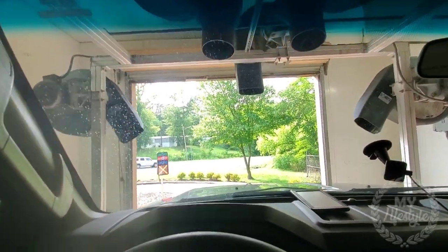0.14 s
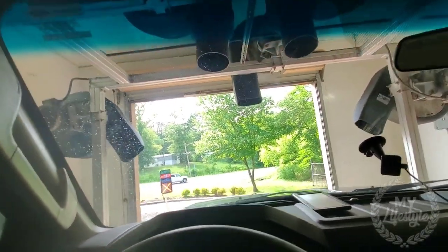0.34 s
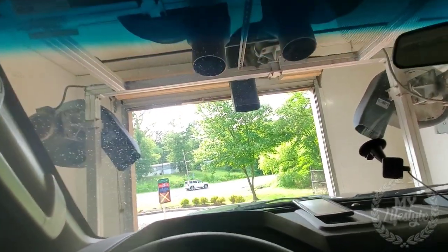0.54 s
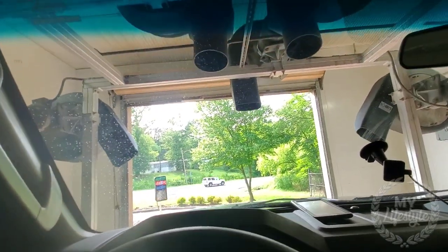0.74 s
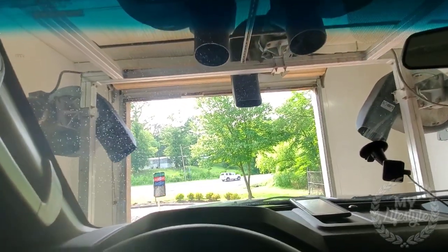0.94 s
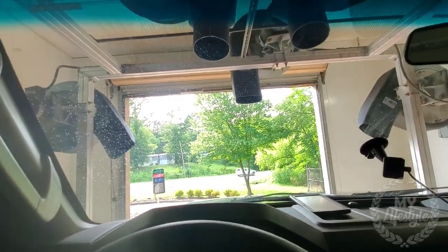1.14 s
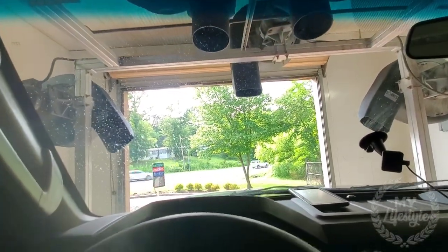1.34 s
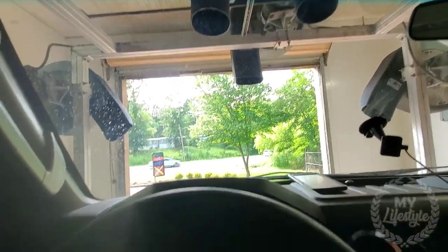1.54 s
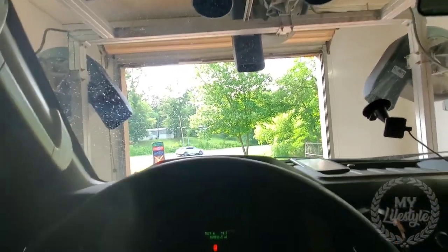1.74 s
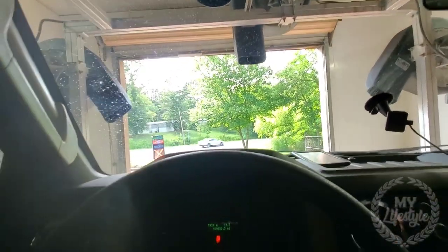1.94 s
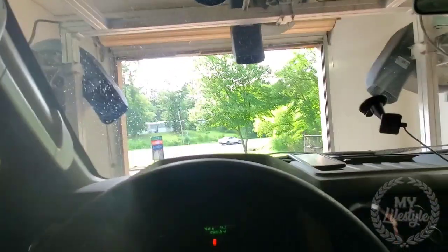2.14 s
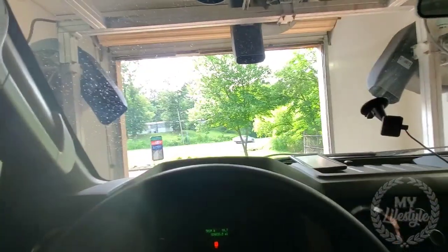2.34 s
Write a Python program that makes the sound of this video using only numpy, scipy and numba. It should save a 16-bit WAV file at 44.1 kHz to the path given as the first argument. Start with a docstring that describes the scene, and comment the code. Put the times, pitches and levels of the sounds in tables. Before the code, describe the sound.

Car wash dryer blowers roar low and steady, heard from inside a closed car.

```python
"""A wash bay, from the driver's seat with the windows shut: big dryer blowers roar over the car.
Turbulent air shakes glass and panels and booms in the cabin's resonances, the strongest as a drone.
The rush of the jets leaks in, dulled by the glass, and air starts to whistle at a seal.
A handheld stereo microphone hisses faintly and holds down the peaks."""
import sys
import numpy as np
from scipy import signal
from scipy.fft import rfft, irfft
from scipy.io import wavfile
from scipy.ndimage import uniform_filter1d, minimum_filter1d
from numba import njit

SR = 44100
rng = np.random.default_rng(int(sys.argv[2]) if len(sys.argv) > 2 else 0)


def unload_wav(signal):
    """Save mono or channel-first audio to the path in sys.argv[1] as 16-bit WAV at rate SR, clipped to [-1, 1]."""
    wavfile.write(
        sys.argv[1],
        SR,
        np.round(np.clip(np.atleast_2d(signal).T, -1, 1) * 32767).astype(np.int16),
    )


N = 110250
ANTIPHASE = np.array([[1], [-1]])
AIR_FLICKER_DB = .5

# Bodywork spectra, in phase and in antiphase at the ears. Each row: frequency in Hz, relative level in dB.
BODY_IN_PHASE = [(12, -55.5), (20, -39.5), (48, -9), (160, -0.5), (201, -2), (370, -5.5), (403, -12.5),
                 (480, -12), (983, -30), (1190, -37.5), (1300, -36), (1690, -56), (2860, -120)]
BODY_ANTIPHASE = [(12, -43.5), (30, -27.5), (60, -18.5), (85, -19), (125, -10), (170, -6.5), (215, 0.5),
                  (265, -12), (370, -6), (497, -10), (743, -15), (1300, -24), (1690, -55), (2860, -120)]
# Each row: time in seconds, boom level in dB, roar level in dB. Only the swing about the mean counts.
BLAST_SWELLS = [(0, -10.5, -17.5), (.3, -18, -15.5), (.55, -9.5, -15), (.9, -14.5, -12.5),
                (1.25, -14.5, -13.5), (1.6, -13, -15), (1.95, -16.5, -13.5), (2.25, -14.5, -14.5),
                (2.5, -18, -16.5)]


def blast(body_db=-12.5, side_db=-13.5, boom_top_hz=172):
    """Air beats on glass and roof and rings the cabin; low boom and upper roar swell separately."""
    mid = turbulence(colour(BODY_IN_PHASE), AIR_FLICKER_DB)
    side = turbulence(colour(BODY_ANTIPHASE), AIR_FLICKER_DB)
    air = undb(body_db) * (mid + undb(side_db) * side * ANTIPHASE) + cabin()
    boom, roar = split(air, boom_top_hz)
    boom_db, roar_db = curve(BLAST_SWELLS, column=1), curve(BLAST_SWELLS, column=2)
    return boom * undb(boom_db - boom_db.mean()) + roar * undb(roar_db - roar_db.mean())


# Each row: frequency in Hz, width in Hz, level in dB, left over right in dB, antiphase power share 0-1.
CABIN_MODES = [(60, 10, -28, 1, .004), (93, 14, -25, 1, .01), (135, 30, -27, 1, .02),
               (215, 60, -25, -2, .8), (430, 22, -32, 1, .05), (960, 60, -46, 1, .3)]


def cabin(drift=.04, swell_db=2):
    """Standing waves of the closed cabin, kept booming by the air."""
    out = 0
    for hz, width_hz, db, lean_db, side_share in CABIN_MODES:
        centre_hz = hz * (1 + drift * walk(4))
        swell = undb(swell_db * walk(5))
        mid, side = ring(centre_hz, width_hz), ring(centre_hz, width_hz)
        pair = np.sqrt(1 - side_share) * mid + np.sqrt(side_share) * side * ANTIPHASE
        out = out + undb(db) * swell * pair * lean_left(lean_db)
    return out


# Each row: time in seconds, pitch in Hz, level in dB.
DRONE_TRACK = [(0, 166.6, -17), (.1, 161.2, -24), (.22, 172.4, -16), (.4, 166.3, -23.5),
               (.64, 166.3, -16.5), (.85, 153.9, -28.5), (1.12, 170, -18), (1.22, 161.4, -32),
               (1.38, 158.3, -23), (1.5, 160, -34.5), (1.7, 164.6, -21), (1.9, 151.8, -17),
               (2.05, 165.2, -33.5), (2.18, 168, -13.5), (2.26, 159.7, -16.5), (2.34, 150, -16),
               (2.42, 161.1, -21.5), (2.5, 158, -16.5)]


def drone(waver_db=2):
    """The cabin's strongest standing wave holds a wavering note."""
    note = tone(curve(DRONE_TRACK, column=1), waver_hz=6, rate_hz=18)
    level_db = curve(DRONE_TRACK, column=2) + waver_db * walk(18)
    return note * undb(level_db) * lean_left(db=1)


# Each row: time in seconds, pitch in Hz, level in dB.
GUST_TRACK = [(0, 298, -45.5), (.3, 300, -31.5), (.45, 279.3, -24.5), (.75, 341.6, -25.5),
              (.95, 318.5, -32.5), (1.08, 370, -22), (1.16, 338.5, -29), (1.215, 345.3, -10.5),
              (1.27, 310, -27), (1.44, 363.2, -20.5), (1.5, 400, -32.5), (1.56, 383.7, -20),
              (1.64, 329.5, -17.5), (1.7, 381.8, -25.5), (1.75, 349.2, -35.5), (1.85, 377, -23),
              (1.9, 341.4, -29), (1.97, 308.5, -25.5), (2.1, 380, -26), (2.2, 302, -21.5),
              (2.32, 323.3, -19), (2.41, 370.8, -20), (2.5, 320, -34)]


def gusts(tone_db=3):
    """Surges in the upper roar bend a resonance up and down."""
    hz = curve(GUST_TRACK, column=1)
    surge = ring(hz, width_hz=110) + undb(tone_db) * tone(hz, waver_hz=19.4, rate_hz=30)
    return level(surge, 0) * undb(curve(GUST_TRACK, column=2))


# Jet noise inside the car. Each row: frequency in Hz, relative level in dB.
RUSH_SPECTRUM = [(600, -33), (900, -17.5), (1200, -16), (1500, -10.5), (1910, -11.5), (2500, -13),
                 (3190, -16.5), (4200, -20.5), (5200, -28), (6800, -32), (7400, -39), (8200, -58)]
# Each row: time in seconds, low band gain in dB, high band gain in dB.
RUSH_GAINS = [(0, -38.5, -37.5), (.12, -37.5, -37.5), (.6, -36.5, -36.5), (1.1, -36.5, -38),
              (1.15, -39, -37), (1.37, -38, -37.5), (1.42, -39.5, -39.5), (1.7, -39, -39),
              (1.76, -39, -39.5), (1.9, -39.5, -38.5), (2., -39, -38.5), (2.14, -39, -39),
              (2.5, -38.5, -38)]


def rush(crossover_hz=3400):
    """Hiss of the jets, dulled by the glass and unrelated at the two ears."""
    hiss = np.array([turbulence(colour(RUSH_SPECTRUM), AIR_FLICKER_DB) for _ in range(2)])
    low, high = split(hiss, crossover_hz)
    return low * undb(curve(RUSH_GAINS, column=1)) + high * undb(curve(RUSH_GAINS, column=2))


# Each row: time in seconds, pitch in Hz, level in dB.
WHISTLE_TRACK = [(1.55, 1380, -56), (1.85, 1370, -50), (1.9, 1378, -41.5), (1.98, 1380, -42),
                 (2.07, 1390, -43), (2.14, 1380, -46), (2.185, 1372, -34.5), (2.25, 1374, -36.5),
                 (2.29, 1380, -42), (2.34, 1365, -37), (2.385, 1390, -39.5), (2.42, 1398, -36.5),
                 (2.47, 1385, -44), (2.5, 1370, -48)]


def whistle(flutter_db=3, breath_hz=1700., breath_db=-1):
    """Air at a seal on the left makes a rough edge tone inside a broad breath."""
    hz = curve(WHISTLE_TRACK, column=1)
    note = tone(hz, waver_hz=32, rate_hz=80) * undb(flutter_db * walk(40))
    ears = []
    for _ in range(2):
        rasp = ring(hz, width_hz=130)
        breath = ring(np.full(N, breath_hz), width_hz=800)
        ears.append(note + rasp + undb(breath_db) * breath)
    return level(np.array(ears), 0) * lean_left(db=5) * undb(curve(WHISTLE_TRACK, column=2))


def microphone_hiss(level_db=-60, common_share=.12):
    """Steady treble noise, mostly unrelated between the channels."""
    treble = colour([(4400, -2), (9500, -2), (13000, -1), (17000, -1)])
    left, right, common = (turbulence(treble, flicker_db=0) for _ in range(3))
    hiss = np.sqrt(1 - common_share) * np.array([left, right]) + np.sqrt(common_share) * common
    return hiss * undb(level_db) * lean_left(db=2)


def undb(db):
    """Decibels to gain."""
    return 10 ** (np.asarray(db) / 20)


def level(x, db):
    """Scale to an rms level."""
    return x * undb(db) / np.sqrt(np.mean(x ** 2))


def lean_left(db):
    """Stereo gains with left over right by db."""
    return undb(ANTIPHASE * db / 2)


def curve(table, column):
    """A table column over time."""
    rows = np.array(table, float)
    return np.interp(np.arange(N) / SR, rows[:, 0], rows[:, column])


def bin_hz():
    """Frequency of each spectrum bin."""
    return np.maximum(np.arange(N // 2 + 1) * SR / N, 1)


def colour(points):
    """Gain per bin from (Hz, dB) points, silent beyond the ends."""
    hz, db = np.array(points, float).T
    return undb(np.interp(np.log(bin_hz()), np.log(hz), db, left=-150, right=-150))


def through(x, gain):
    """Filter by a gain per bin, with mirrored ends."""
    mirrored = np.concatenate([x, x[:, ::-1]], axis=1)
    fine_gain = np.repeat(gain, 2, axis=-1)[..., :N + 1]
    return irfft(rfft(mirrored) * fine_gain, 2 * N)[:, :N]


def split(x, hz):
    """The bands below and above a crossover."""
    low = through(x, 1 / (1 + (bin_hz() / hz) ** 8))
    return low, x - low


def walk(rate_hz):
    """Random steps, smoothed twice; spread near 1."""
    hold = int(SR / rate_hz)
    steps = np.repeat(rng.standard_normal(N // hold + 1), hold)
    return 1.3 * uniform_filter1d(uniform_filter1d(steps, hold), hold)[:N]


def turbulence(gain, flicker_db):
    """Coloured noise whose half-octave bands each flicker on their own, rms 1."""
    spectrum = rfft(rng.standard_normal(N)) * gain
    half_octaves = 2 * np.log2(bin_hz())
    out = 0
    for band in range(8, 29):
        window = np.cos(np.pi / 2 * np.clip(half_octaves - band, -1, 1)) ** 2
        out = out + irfft(spectrum * window, N) * undb(flicker_db * walk(9))
    return level(out, 0)


def tone(hz, waver_hz, rate_hz):
    """A sine of wavering pitch, rms 1."""
    return np.sqrt(2) * np.sin(2 * np.pi * np.cumsum(hz + waver_hz * walk(rate_hz)) / SR)


def ring(hz, width_hz):
    """Noise passed twice through a resonance, rms 1."""
    once = bandpass(rng.standard_normal(N), hz, float(width_hz))
    return level(bandpass(once, hz, float(width_hz)), 0)


@njit
def bandpass(x, hz, width_hz):
    """State-variable filter with a moving centre."""
    out, band_state, low_state = np.empty(len(x)), 0., 0.
    for i in range(len(x)):
        g, damping = np.tan(np.pi * hz[i] / SR), width_hz / hz[i]
        band = (band_state + g * (x[i] - low_state)) / (1 + g * (g + damping))
        band_state = 2 * band - band_state
        low_state += 2 * g * band
        out[i] = damping * band
    return out


@njit
def follow(x, attack_s, release_s):
    """Envelope with separate rise and fall times."""
    envelope, out = x[0], np.empty(len(x))
    for i in range(len(x)):
        envelope += (x[i] - envelope) / (SR * (attack_s if x[i] > envelope else release_s))
        out[i] = envelope
    return out


def compress(x, threshold_db, ratio):
    """Ease both channels down when the louder one passes the threshold."""
    envelope = follow(np.abs(x).max(axis=0), attack_s=.0031, release_s=.047)
    return x * np.minimum(undb(threshold_db) / (envelope + 1e-9), 1) ** (1 - 1 / ratio)


def limit(x, ceiling_db, lookahead_s):
    """Dip the gain smoothly ahead of each peak over the ceiling."""
    look = int(lookahead_s * SR)
    allowed = np.minimum(undb(ceiling_db) / (np.abs(x).max(axis=0) + 1e-9), 1)
    held = minimum_filter1d(allowed, 2 * look + 1)
    return x * uniform_filter1d(uniform_filter1d(held, look), look)


# Stereo balance. Each row: frequency in Hz, left over right in dB.
EAR_BALANCE = [(60, -0.5), (160, 1.5), (250, -2), (410, 2), (660, 0.5), (1060, 1), (1720, -3), (2770, -2.5),
               (4480, 1)]


def scene():
    """All air sounds, leaning left or right by frequency."""
    air = blast() + drone() + gusts() + rush() + whistle()
    hz, db = np.array(EAR_BALANCE, float).T
    balance_db = np.interp(np.log(bin_hz()), np.log(hz), db)
    return through(air, lean_left(balance_db))


def record(dry):
    """Microphone hiss, gentle compression, a limiter and a steep treble cut."""
    x = compress(dry + microphone_hiss(), threshold_db=-3.5, ratio=1.4)
    x = limit(x, ceiling_db=-.4, lookahead_s=.004)
    cutoff_hz = 15720
    return signal.sosfilt(signal.ellip(12, .2, 80, cutoff_hz, fs=SR, output="sos"), x)


dry = scene()
out = record(dry)
unload_wav(out)
```